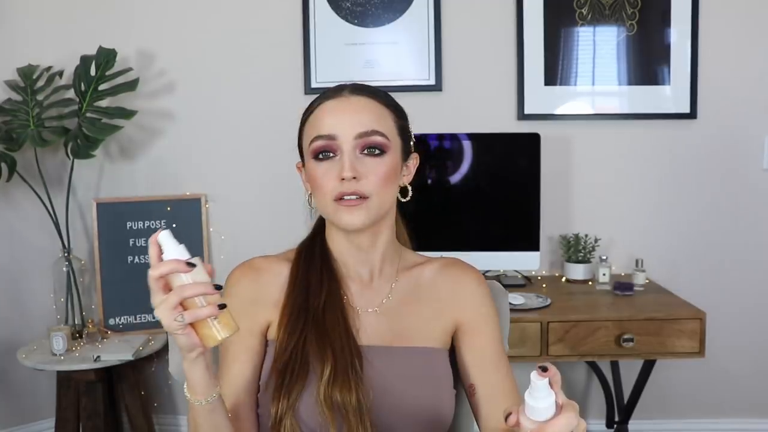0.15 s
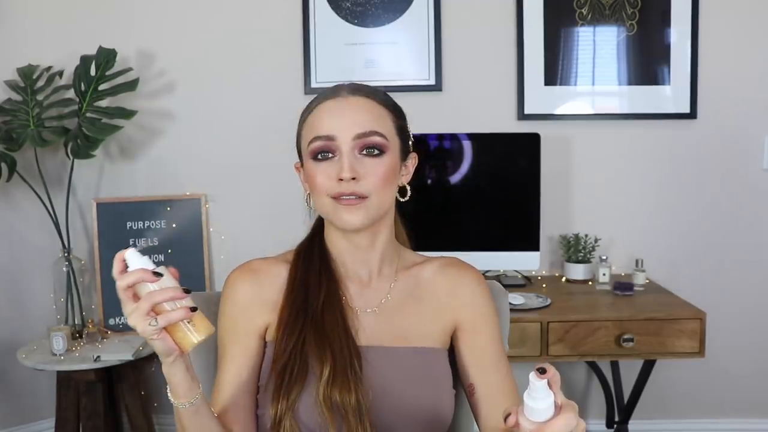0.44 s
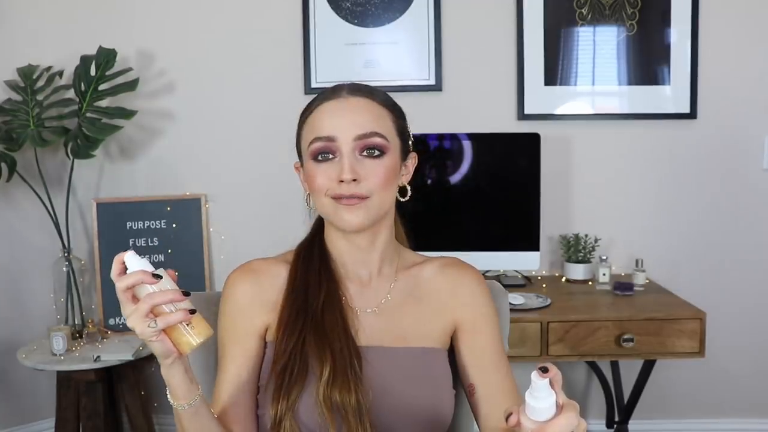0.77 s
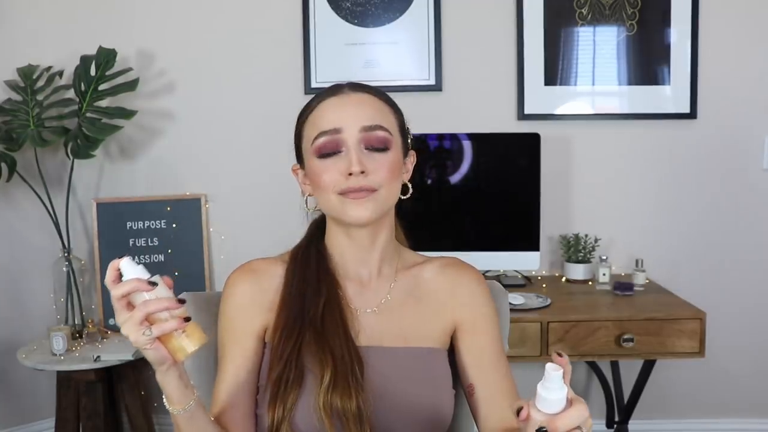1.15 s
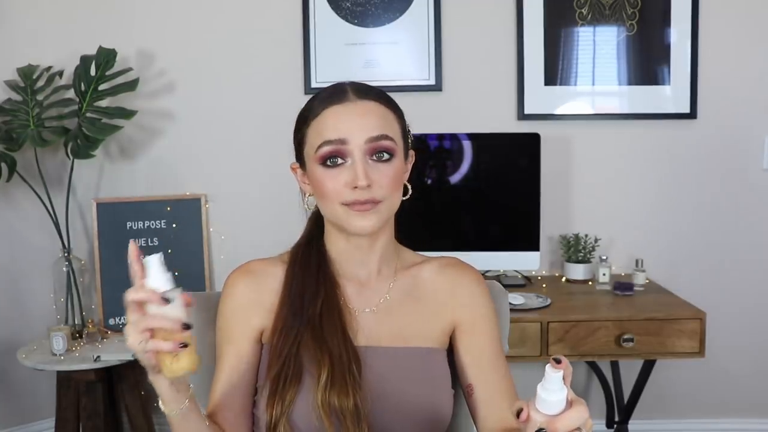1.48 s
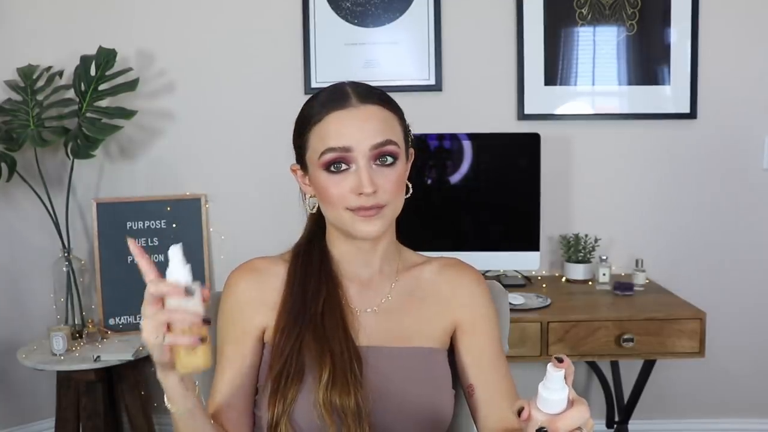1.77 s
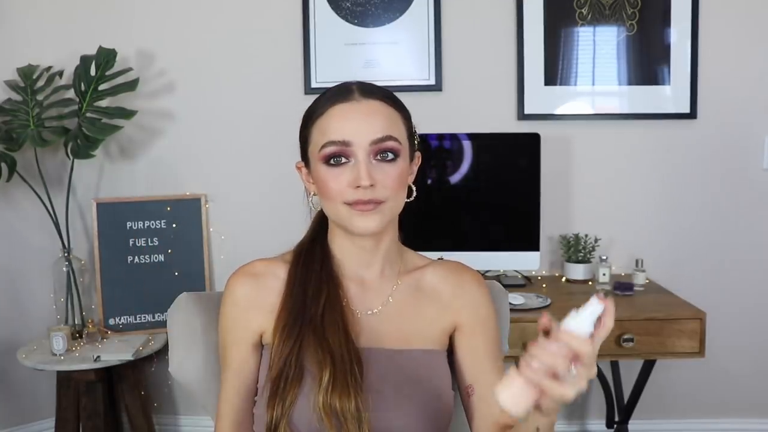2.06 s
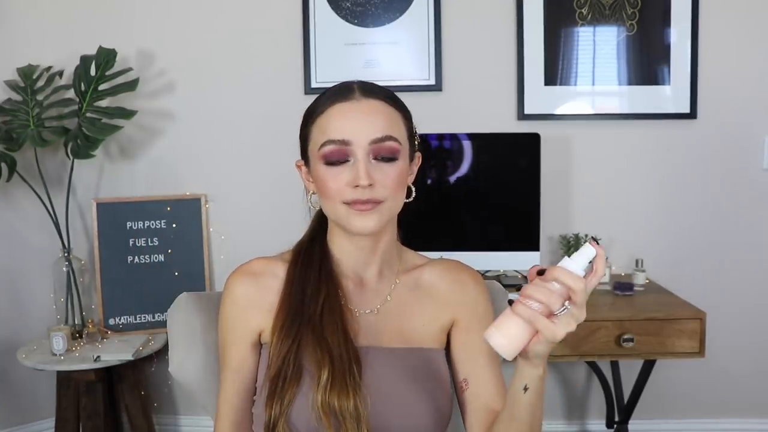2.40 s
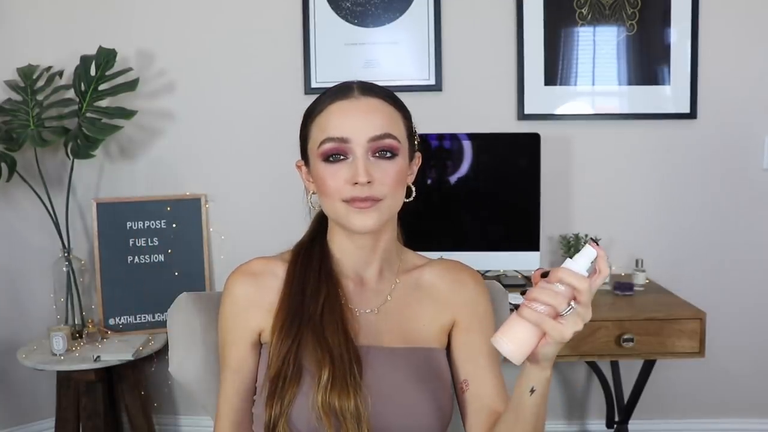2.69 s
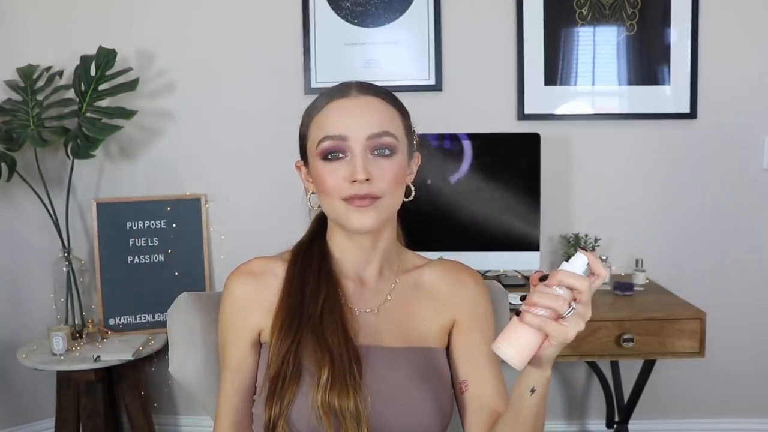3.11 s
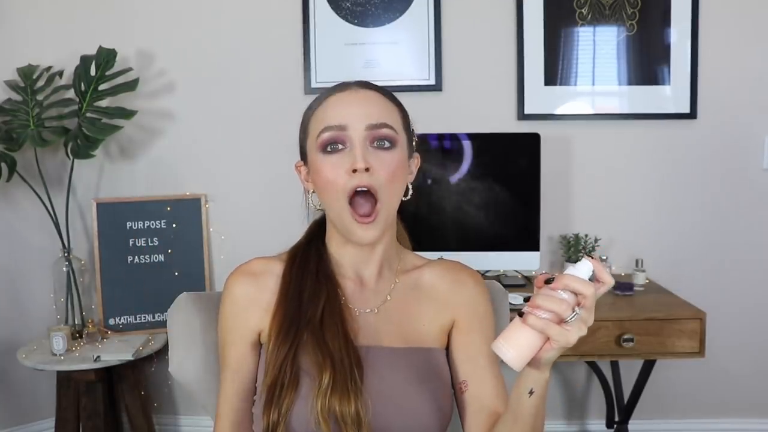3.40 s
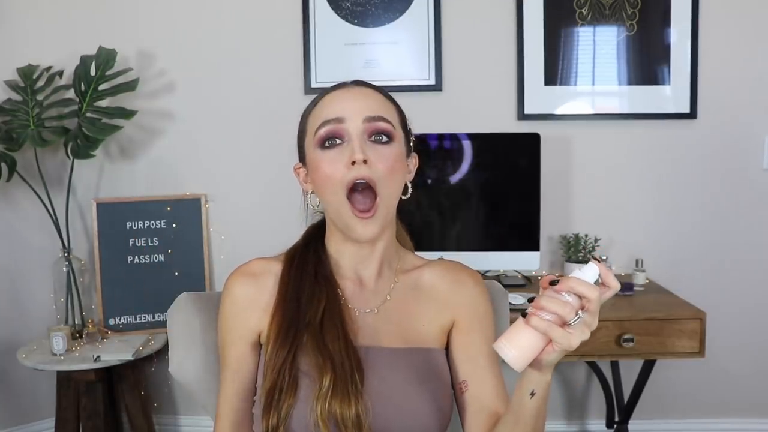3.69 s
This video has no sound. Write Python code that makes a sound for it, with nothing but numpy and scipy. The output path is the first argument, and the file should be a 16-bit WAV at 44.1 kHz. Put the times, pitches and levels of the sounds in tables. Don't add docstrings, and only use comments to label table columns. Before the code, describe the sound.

A pump bottle creaks, knocks and gives a short hard spritz; hands shift, a bottle lands with a hollow thud, plastic ticks, then a second bottle releases a longer fine mist near the microphone, over steady hum.

```python
import sys
import numpy as np
from scipy import signal
from scipy.fft import rfft, irfft
from scipy.io import wavfile
from scipy.ndimage import uniform_filter1d

SR = 44100
rng = np.random.default_rng(int(sys.argv[2]) if len(sys.argv) > 2 else 0)


def dump_mix(stems):
    frames = np.atleast_2d(stems).T
    limited = np.clip(frames, -1, 1)
    pcm = np.round(limited * 32767).astype(np.int16)
    wavfile.write(sys.argv[1], SR, pcm)


def decibels_to_gain(level_db):
    exponent = np.asarray(level_db, float) / 20
    return 10 ** exponent


N = 169785

# start_s, stop_s
STROKES = [
    (.3595, .488),
    (2.802, 3.311),
]
# level_db, swell_s, swell_gain_db
PRESSES = [
    (-32, 0.045, 3),
    (-43.5, 0.1, 10),
]


def level(x, db):
    return x * decibels_to_gain(db) / np.sqrt(np.mean(x ** 2))


def colour(x, points):
    hz, db = np.array(points, float).T
    f = np.arange(len(x) // 2 + 1) * SR / len(x) + 1
    gain = decibels_to_gain(np.interp(np.log(f), np.log(hz), db))
    return irfft(rfft(x) * gain, len(x))


def ring(x, hz, width):
    return signal.lfilter(*signal.iirpeak(hz, hz / width, SR), x)


def ring_twice(x, hz, width, second_width):
    return ring(ring(x, hz, width), hz, second_width)


def walk(rate):
    hold = int(SR / rate)
    steps = np.repeat(rng.standard_normal(N // hold + 1), hold)
    return 0.58 * uniform_filter1d(uniform_filter1d(steps, hold), hold)[:N]


def arch(t, start, length):
    return np.sin(np.pi * np.clip((t - start) / length, 0, 1))


def add(out, at, x):
    i = int(at * SR)
    out[i:i + len(x)] += x[:N - i]


def mains(t):
    # multiple, level_db (rms)
    hum_rows = [(1, -35.5), (2, -62), (3, -59), (4, -66), (5, -72.5), (6, -75.5), (7, -67), (8, -73.5),
                (9, -64), (11, -78), (13, -78.5), (15, -75), (19, -78), (23, -75.5), (31, -80), (33, -84)]
    buzz_orders = [17, 21, 25, 27, 29, 35, 37, 39, 41, 43, 45, 47]
    # pitch_hz, density_db
    hiss_mid = [(30, -2.5), (100, 2), (200, -3), (400, -4.5), (1200, -10), (3000, -13), (8000, -14.5),
                (15500, -15)]
    # pitch_hz, density_db
    hiss_side = [(35, -85), (60, -55), (171, -9), (352, -3), (692, -4), (1130, -5), (1800, -8),
                 (15700, -4.5)]
    mains_hz, even_turn = 60.0, 0.12
    buzz_db, buzz_db_per_oct = -82.5, -5.5
    rows = list(hum_rows) + [(k, buzz_db + buzz_db_per_oct * np.log2(k / 20)) for k in buzz_orders]
    hum = np.zeros(N)
    for k, db in rows:
        turns = k * mains_hz * t + even_turn * (1 - k % 2)
        hum += np.sqrt(2) * decibels_to_gain(db) * np.sin(2 * np.pi * turns)
    mid = level(colour(rng.standard_normal(N), hiss_mid), -57)
    side = level(colour(rng.standard_normal(N), hiss_side), -61)
    return hum + mid + side * np.array([[1], [-1]])


def room(x):
    # delay_s, level_db
    walls = [(.0075, -13.5), (.012, -12.5), (.0165, -16.5), (.024, -18), (.0265, -33)]
    t60_low_s, t60_high_s, split_hz = 0.4, 0.37, 5500
    gap_s, build_s, tail_db, side_db = 0.006, 0.013, -7, -20
    u, tails = np.arange(int(0.7 * SR)) / SR, []
    low = signal.butter(2, split_hz, fs=SR)
    for noise in rng.standard_normal((2, len(u))):
        bass = signal.filtfilt(*low, noise)
        tail = bass * 1000 ** (-u / t60_low_s) + (noise - bass) * 1000 ** (-u / t60_high_s)
        tail *= np.clip((u - gap_s) / build_s, 0, 1)
        tails.append(tail / np.sqrt(np.sum(tail ** 2)) * decibels_to_gain(tail_db))
    for lag, db in walls:
        tails[0][int(lag * SR)] += decibels_to_gain(db)
    mid, side = (signal.fftconvolve(x, h)[:N] for h in tails)
    return x + mid + decibels_to_gain(side_db) * side * np.array([[1], [-1]])


def rustles(t):
    # start_s, length_s, level_db, centre_hz
    rubs = [(1.17, .14, -67, 3300), (1.44, .07, -61, 2500), (1.45, .05, -61, 750), (1.515, .12, -62, 900),
            (1.86, .07, -61, 3000), (1.89, .05, -66, 5500), (2.03, .1, -64, 5000), (2.59, .035, -59, 2900),
            (2.18, .12, -68, 4800), (2.652, .035, -55, 2600), (2.82, .07, -58, 900)]
    noise = rng.standard_normal(N) * decibels_to_gain(2.4 * walk(150))
    out = np.zeros(N)
    for at, length, db, hz in rubs:
        out += level(ring_twice(noise, hz, 0.65 * hz, 0.65 * hz), db) * arch(t, at, length)
    return out


def creaks(t):
    # start_s, length_s, level_db
    scrapes = [
        (0.031, 0.013, -52),
        (.073, 0.011, -52),
        (0.109, .008, -58),
    ]
    # pitch_hz, width_hz, level_db
    spring = [(2830, 730, 0.26), (4830, 350, -2.3)]
    noise = rng.standard_normal(N)
    tone = level(sum(decibels_to_gain(db) * ring_twice(noise, hz, w, 2 * w) for hz, w, db in spring), 0)
    return tone * sum(decibels_to_gain(db) * arch(t, at, length) for at, length, db in scrapes)


def ticks():
    # start_s, peak_db, knock_db, brightness_hz
    snaps = [(.142, -39, -49, 1950), (1.511, -56, -47, 6200), (1.932, -38, -54, 5140),
             (1.946, -37, -60, 7830), (2.139, -39, -55, 6030), (2.594, -43.5, -58, 9500),
             (2.631, -50, -54, 4500), (2.708, -34.5, -50, 4870), (2.717, -38, -63, 1680),
             (2.799, -36, -42.5, 4950), (2.925, -45, -46.5, 1500), (3.008, -38, -44, 1500),
             (3.425, -33.5, -43, 5160)]
    # pitch_hz, level_db, t60_s
    body = [(684, -3.5, 0.029), (763, -7, 0.097), (1500, -0.5, 0.016)]
    crack_s, grit_db = 0.00088, 6
    out, u = np.zeros(N), np.arange(3000) / SR
    knock = sum(decibels_to_gain(db) * np.sin(2 * np.pi * hz * u) * 1000 ** (-u / t60) for hz, db, t60 in body)
    decay = np.exp(-u / crack_s)
    for (at, db, knock_db, hz), noise in zip(snaps, rng.standard_normal((len(snaps), len(u)))):
        grit = ring(noise * decay, hz, 0.67 * hz)
        crack = np.sin(2 * np.pi * hz * u) * decay + decibels_to_gain(grit_db) * grit
        add(out, at, decibels_to_gain(db) * crack / np.abs(crack).max() + decibels_to_gain(knock_db) * knock)
    return out


def thuds():
    # start_s, peak_db, pitch_hz, t60_s
    knocks = [
        (.142, -41, 1310, 0.0087),
        (.143, -37, 2020, 0.013),
        (1.509, -30, 760, 0.013),
        (1.510, -35.5, 3720, 0.015),
        (1.515, -49.5, 443, 0.27),
        (1.931, -40.5, 2000, .011),
        (1.933, -48, 7800, .012),
        (1.935, -49.5, 727, 0.18),
        (2.803, -46.5, 1011, 0.03),
    ]
    out, u = np.zeros(N), np.arange(SR // 3) / SR
    for at, db, hz, t60 in knocks:
        add(out, at, decibels_to_gain(db) * np.sin(2 * np.pi * hz * u) * 1000 ** (-u / t60))
    return out


def pops():
    # start_s, peak_db, pitch_hz, length_s
    bubbles = [(.142, -29.5, 2730, 0.0028), (1.052, -41.5, 3130, 0.0023), (1.141, -47.5, 2400, 0.0023),
               (1.44, -42, 2570, 0.0025), (1.445, -49, 1500, 0.0072), (1.452, -42.5, 2100, 0.0044),
               (1.464, -38, 2000, 0.001), (1.5, -41.5, 2810, 0.0083), (1.509, -18, 3080, 0.0031),
               (2.593, -39.5, 2690, 0.0044), (2.657, -45, 2400, 0.0018), (2.668, -46.5, 2480, 0.0031),
               (2.808, -32.5, 2100, 0.0025), (0.94, -53, 6600, .003), (3.165, -47, 1150, 0.004),
               (3.219, -40, 3300, 0.0035), (3.235, -44, 3500, .004), (2.812, -33.5, 1500, 0.001)]
    rise, attack = 0.011, 0.17
    neighbour_db, grit_db, grit_pitch, grit_width = -16.5, -11, 1.6, 0.9
    out = np.zeros(N)
    for (at, db, hz, length), noise in zip(bubbles, rng.standard_normal((len(bubbles), 1500))):
        u = np.arange(len(noise)) / SR
        age = u / length
        shape = np.clip(age / attack, 0, 1) * np.exp(-age ** 2.3)
        bent_time = u * (1 + rise * age / 2)
        main, below, above = (np.sin(2 * np.pi * f * bent_time) for f in (hz, hz * 0.675, hz * 1.22))
        tone = shape * (main + decibels_to_gain(neighbour_db) * (below + above))
        splash = ring_twice(noise, grit_pitch * hz, grit_width * hz, hz) * np.exp(-age * 3.2)
        add(out, at, decibels_to_gain(db) * (tone + decibels_to_gain(grit_db) * splash))
    return out


def spray(t, stroke, press, jet, nozzle):
    (start, stop), (db, swell, gain_db) = stroke, press
    open_s, shut_s = 0.0052, 0.002
    drops = rng.standard_normal(N) * decibels_to_gain(1.5 * walk(9000))
    press_db = gain_db * (np.clip((t - start) / swell, 0, 1) - 1)
    hiss = level(colour(drops, jet), 0) * decibels_to_gain(press_db)
    fade_db = -6 * np.clip(t - start, 0, 1)
    for hz, width, ring_db in nozzle:
        wobble_db = 1.5 * walk(60)
        cavity = level(ring_twice(drops, hz, width, 2 * width), ring_db)
        hiss = hiss + cavity * decibels_to_gain(wobble_db + 0.4 * press_db + fade_db)
    gate = np.clip((t - start) / open_s, 0, 1) * np.exp(-np.clip(t - stop, 0, 1) / shut_s)
    return hiss * gate * decibels_to_gain(db - 0.04 * walk(40))


def hard_puff(t):
    # pitch_hz, density_db
    jet = [(600, -21.5), (1000, -15), (2000, -8), (3200, -3.5), (5600, -3), (6200, -10), (12200, -14),
           (15700, -18.5)]
    # pitch_hz, width_hz, level_db
    nozzle = [(4400, 460, -16), (5260, 700, -17), (2100, 190, -23)]
    return spray(t, STROKES[0], PRESSES[0], jet, nozzle)


def fine_mist(t):
    # pitch_hz, density_db
    jet = [(600, -21.5), (2300, -12), (2900, -5.5), (6000, -3), (8500, -5.5), (9800, -2.5), (13500, -2.5),
           (15500, -8.5)]
    # pitch_hz, width_hz, level_db
    nozzle = [(5100, 580, -10.5), (4500, 290, -16.5), (5770, 620, -25)]
    return spray(t, STROKES[1], PRESSES[1], jet, nozzle)


def scene():
    t = np.arange(N) / SR
    puff = hard_puff(t)
    mist = fine_mist(t)
    handling = pops() + thuds() + ticks() + creaks(t) + rustles(t)
    return room(puff + mist + handling) + decibels_to_gain(-3.5) * mist + mains(t)


def band_limit(x):
    return signal.sosfilt(signal.butter(12, 16300, fs=SR, output="sos"), x)


def record(dry):
    top_cut = signal.ellip(10, 0.2, 70, 15780, fs=SR, output="sos")
    return band_limit(signal.sosfilt(top_cut, dry))


dry = scene()
out = record(dry)
dump_mix(out)
```